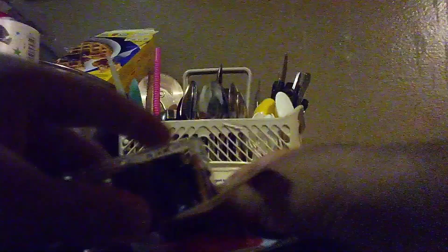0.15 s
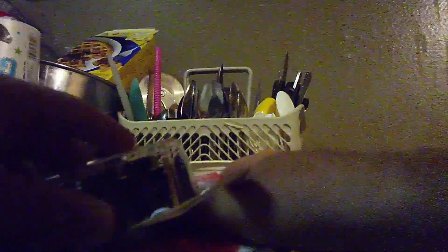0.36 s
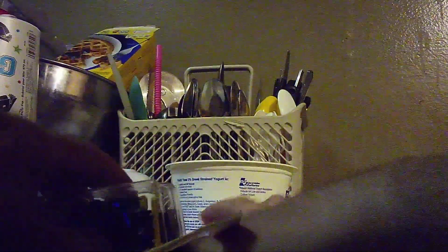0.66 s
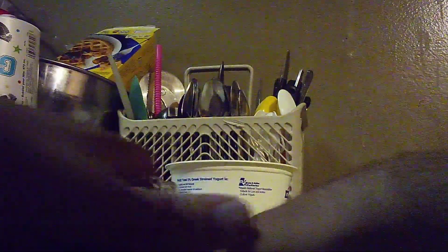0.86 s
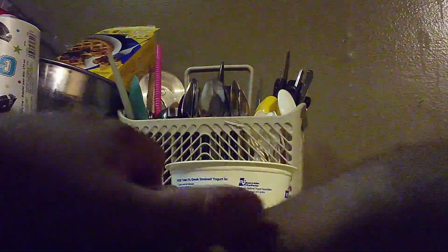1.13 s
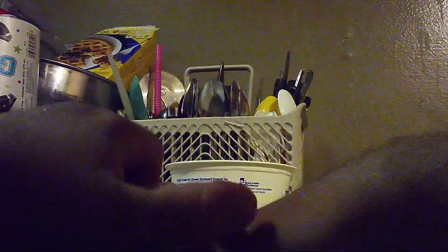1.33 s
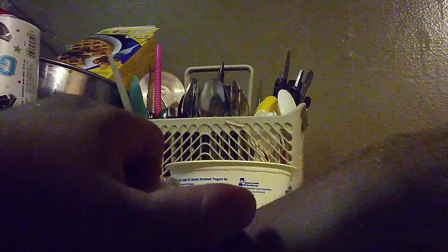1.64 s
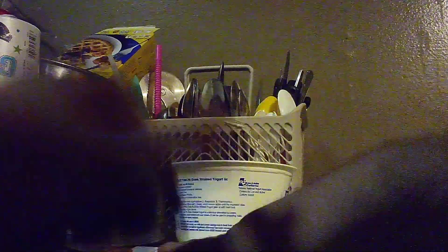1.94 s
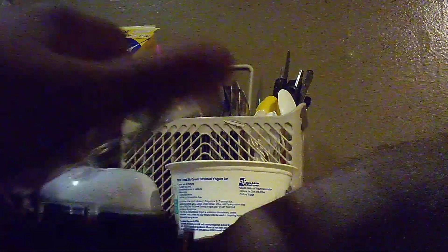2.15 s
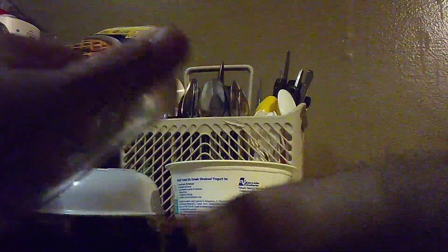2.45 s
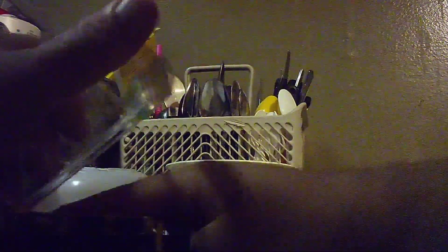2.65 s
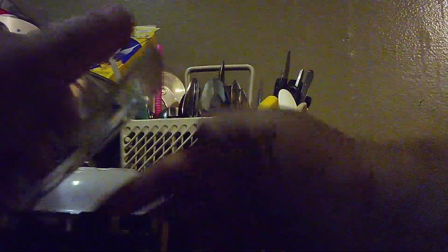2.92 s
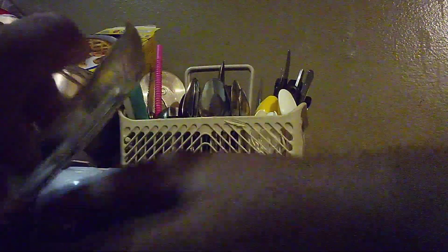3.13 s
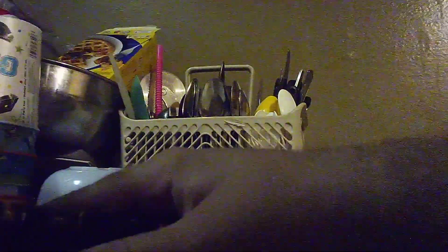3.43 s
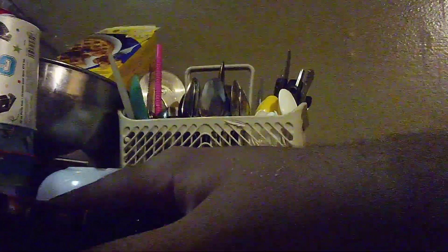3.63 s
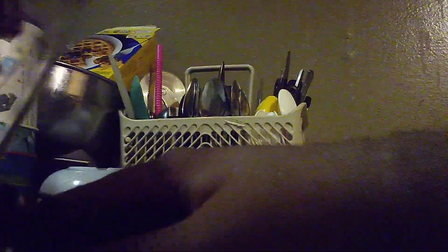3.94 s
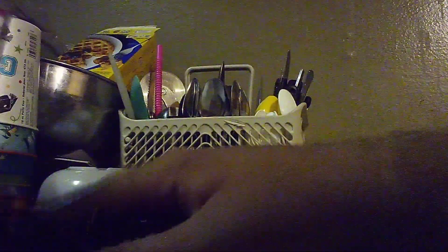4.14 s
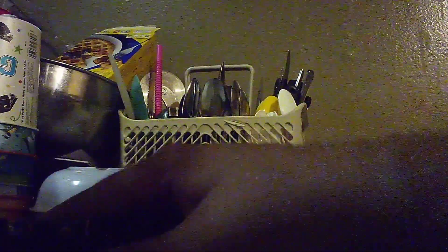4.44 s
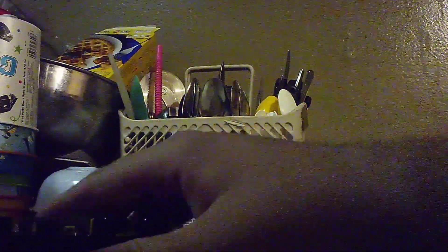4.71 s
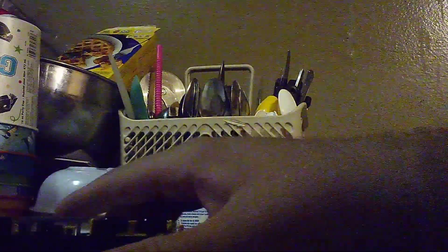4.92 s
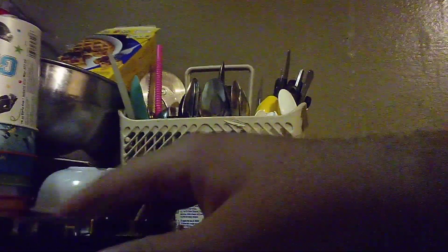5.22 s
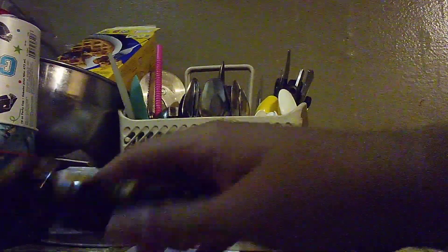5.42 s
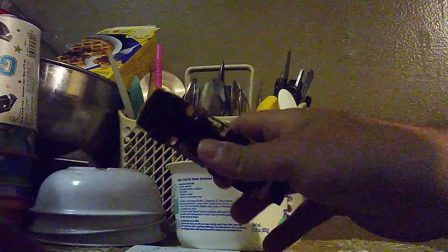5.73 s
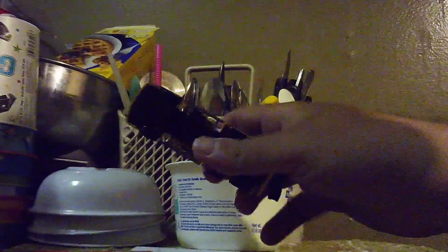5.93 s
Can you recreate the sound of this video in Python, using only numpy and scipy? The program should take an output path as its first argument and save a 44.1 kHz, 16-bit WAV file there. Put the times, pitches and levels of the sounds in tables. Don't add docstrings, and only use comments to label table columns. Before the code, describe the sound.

Thin rigid plastic buckles and pops irregularly under the fingers, with card and film rustling and brief squeaky rubs between the snaps. Some snaps bring dull thumps from the counter. The busiest cracking comes in the middle, with gaps of near quiet afterwards, then small brittle ticks and one hollow plastic knock. Dry, close sound, short room reflections, very faint steady air.

```python
import sys
import numpy as np
from scipy import signal
from scipy.fft import rfft, irfft
from scipy.io import wavfile

SR = 44100
rng = np.random.default_rng(int(sys.argv[2]) if len(sys.argv) > 2 else 0)


def voltage_ratio(decibels):
    exponent = np.asarray(decibels, float) / 20
    return 10 ** exponent


def dump_mix(stems):
    frames = np.atleast_2d(stems).T
    limited = np.clip(frames, -1, 1)
    pcm = np.round(limited * 32767).astype(np.int16)
    wavfile.write(sys.argv[1], SR, pcm)


N = 267687

# pitch_hz, density_db (per Hz)
AIR_SPECTRUM = [(18, -46.5), (30, -20.5), (214, -14.5), (276, -15), (1590, -31), (8000, -49),
                (10400, -73.5), (17600, -120)]
AIR_DB = -72
ROOM_T60_S, ROOM_DB, WALL_CUT_HZ = 0.16, -19, 6000
MIC_TOP_HZ = 6980

# pitch_hz, width_hz, level_db
COUNTER_MODES = [(92, 14, -12), (137.5, 21, 3), (191.1, 48, -14.5), (281.8, 160, -2.5)]
SHELL_MODES = [(381, 90, -2.5), (460, 260, 1.5), (591, 70, -3.5), (746, 60, 0.5), (840, 8.2, 0),
               (1040, 110, 0.5), (1326, 19, -4.5)]
CARD_MODES = [(1550, 240, -11), (1900, 46, 0.5), (2300, 320, 6.5), (2840, 270, -12), (3200, 55, -16.5)]
FILM_MODES = [(3770, 1400, -1), (4670, 720, 3.5), (5364, 300, -3), (5880, 1100, -0.5), (7000, 2600, -0.5)]
PEELING_CARD_MODES = [(4140, 200, 8), (6200, 1100, 4.5)]
FLEXING_FILM_MODES = [(4700, 240, -9.5), (6770, 330, -9)]
# start_s, end_s
PEELING_SPAN = (0.38, 0.94)
FLEXING_SPAN = (2.1, 3.4)

# time_s, level_db
COUNTER_RUMBLE = [(0.0, -73.5), (0.62, -58), (0.86, -68.5), (4.09, -72.5), (4.46, -61.5), (4.65, -75.5),
                  (6.07, -77.5)]
# time_s, level_db
COUNTER_HUM = [(5.0, -92.5), (5.15, -75.5), (5.55, -85), (5.7, -64.5), (6.07, -80)]
# start_s, peak_db, pitch_hz
COUNTER_THUMPS = [(.666, -29.5, 184), (0.707, -39, 156), (1.222, -33, 312), (1.363, -40, 290),
                  (1.544, -37, 275), (1.594, -16.5, 182), (1.5989, -20, 296), (1.885, -39, 159),
                  (1.987, -29, 310), (2.025, -19, 300.3), (2.252, -22, 336), (2.468, -33.5, 310),
                  (2.754, -24.5, 310), (2.87, -42.5, 143.4), (3.18, -41.5, 179), (3.254, -36.5, 92),
                  (3.443, -31.5, 134), (4.251, -34, 309), (4.264, -23.5, 131), (4.56, -32.5, 132.5),
                  (5.071, -44.5, 132)]
FREE_T60_S, DAMPED_T60_S = 0.19, 0.045

# pitch_hz, level_db, t60_s
TOY_MODES = [(336, 12, 0.031), (497.6, 0, 0.13), (700, 5, 0.09), (950, 10.5, 0.059), (1240, -4, 0.07)]
TOY_START_S, TOY_DB = 5.776, -23

# time_s, slips_per_s, level_db
JUDDER_SLIDES = [
    [(.375, 92, -46), (.40, 87.2, -38.5), (.46, 108, -38.5), (.52, 121, -44.5), (.535, 64, -96)],
    [(.797, 140, -45.5), (.815, 75, -41), (.85, 56, -44.5), (.87, 270, -67)],
    [(4.512, 138, -43.5), (4.522, 137, -25), (4.545, 140, -25), (4.550, 400, -47), (4.562, 360, -52.5)],
]

# start_s, hold_s, level_db
SHELL_PRESSES = [(0.031, 0.19, -60.5), (0.154, 0.23, -53.5), (0.307, 0.14, -50), (0.44, 0.27, -48),
                 (0.803, 0.16, -60), (0.972, 0.0056, -40), (1.055, 0.028, -43.5), (1.226, 0.01, -38),
                 (1.338, 0.056, -51.5), (1.483, 0.17, -54.5), (1.73, 0.21, -56.5), (1.956, 0.085, -41),
                 (2.06, 0.045, -38), (2.224, 0.11, -41.5), (2.471, 0.024, -42), (2.706, 0.087, -50.5),
                 (2.764, 0.17, -52), (3.204, 0.09, -46.5), (3.449, 0.007, -40.5), (3.851, 0.16, -60.5),
                 (4.134, 0.19, -47), (4.525, 0.088, -53.5), (4.825, 0.012, -61.5), (5.078, 0.029, -53.5),
                 (5.386, 0.061, -64.5), (5.796, 0.031, -53.5), (6.025, 0.061, -59.5)]
# start_s, hold_s, card_db, film_above_card_db
SLIDES = [(0.007, 0.16, -66, -2), (0.156, 0.22, -56.5, -2.5), (0.263, 0.568, -61, 0),
          (0.473, 0.24, -59.5, 7.5), (0.756, 0.22, -70.5, 13.5), (1.034, 0.072, -60, 0.5),
          (1.246, 0.03, -60, -4.5), (1.355, 0.05, -54, -4.5), (1.534, 0.1, -55, 1.5),
          (1.749, .2, -61.5, 2.5), (1.968, 0.05, -52.5, 9), (2.024, 0.081, -40.5, -4.5),
          (2.128, 0.13, -61.5, 3.5), (2.222, 0.091, -39.5, -2), (2.31, 0.041, -64, 12),
          (2.469, 0.012, -40.5, -8.5), (2.518, 0.026, -46.5, -3.5), (2.703, 0.21, -51.5, -2.5),
          (3.201, 0.1, -52.5, 1), (3.31, 0.11, -53.5, -4.5), (3.437, 0.01, -51.5, -18),
          (3.899, 0.037, -46.5, -11), (4.067, 0.0078, -54, 2.5), (4.121, 0.17, -40.5, -3.5),
          (4.584, 0.017, -32, -10.5), (4.606, 0.047, -41, -8.5), (4.814, 0.022, -62.5, -5.5),
          (5.067, 0.041, -69, -14), (5.375, 0.051, -60.5, -27), (5.713, .4, -58, 0)]
GRIP_DB_PER_S = 1400
SHELL_FADE_DB_PER_S, CARD_FADE_DB_PER_S, FILM_FADE_DB_PER_S = 286, 217.5, 228
SHELL_REST_DB, CARD_REST_DB, FILM_REST_DB = -97, -84.5, -84
# start_s,
# hold_s, level_db, pitch_hz, width_hz
SINGING_STROKES = [(2.195, .012, -50, 4650, 200), (2.285, .07, -46, 4650, 150),
                   (2.805, .035, -59, 4650, 200), (2.865, .055, -48, 4900, 600),
                   (4.513, .024, -57, 3700, 900), (4.515, .02, -64, 6500, 900),
                   (4.513, .024, -50, 1650, 300), (3.178, .06, -48, 4650, 200),
                   (2.417, .006, -57, 4690, 250), (2.512, .065, -52, 4650, 200),
                   (3.255, .025, -44, 4600, 500), (5.682, .03, -72, 5800, 3000), (3.06, .1, -77, 2200, 500),
                   (3.055, .04, -68, 880, 150), (4.845, .045, -60, 2440, 600), (4.845, .04, -61, 4900, 800),
                   (4.94, .12, -76, 2500, 800), (4.94, .12, -75, 5000, 1100), (5.12, .03, -60, 730, 70),
                   (5.13, .07, -77, 1960, 100), (5.17, .06, -72, 5000, 1100), (5.24, .11, -73, 4650, 700),
                   (5.24, .11, -75, 2500, 900), (5.5, .07, -76, 2500, 1500), (.39, .05, -57, 1710, 350),
                   (1.606, .03, -43, 300, 420), (4.478, .015, -63, 550, 400),
                   (2.352, .002, -41, 5600, 4000), (.24, .06, -50, 400, 100), (.65, .025, -46, 1300, 500),
                   (5.79, .045, -50, 700, 60), (4.58, .06, -46, 2800, 500), (3.45, .05, -52, 570, 260),
                   (3.45, .06, -50, 2000, 1100), (2.77, .2, -54, 840, 120), (.98, .035, -42, 680, 200)]
SING_FADE_DB_PER_S = 450

# top_s, level_db (rms), ring_hz, crack_above_ring_db, half_length_s
SHARP_CRUMPLES = [(.16, -59.5, 3200, 9.5, 0.036), (.479, -36.5, 1053, -13.5, 0.012),
                  (.608, -45, 950, -0.5, 0.0014), (.756, -48, 722, -2.5, 0.02),
                  (2.017, -30.5, 740, -4, 0.022), (2.062, -32.5, 998, -10.5, 0.025),
                  (2.253, -31, 890, 1.5, 0.026), (2.329, -33, 1040, -2.5, 0.0092),
                  (2.554, -42, 882, 5, 0.016), (2.872, -39.5, 950, 9.5, 0.014),
                  (2.911, -45.5, 2070, 6.5, 0.0099), (3.182, -31, 810, 1, 0.0089),
                  (3.264, -31, 2420, 4, 0.014), (3.308, -41, 1044, -5.5, 0.0019),
                  (4.262, -29, 381, -1, 0.014), (5.12, -46.5, 722, -3.5, 0.018),
                  (5.398, -53, 2300, 5.5, 0.019), (5.472, -45, 2830, -5, 0.022)]
# top_s, level_db (rms), ring_hz, half_length_s
SOFT_CRUMPLES = [(0.049, -63, 1067, 0.065), (0.263, -47.5, 417, 0.029), (0.394, -49, 1715, 0.016),
                 (0.654, -37.5, 980, 0.012), (1.07, -43, 704, 0.022), (1.197, -51.5, 696, 0.021),
                 (2.317, -38.5, 820, 0.015), (4.523, -46, 1667, 0.0059), (5.071, -48, 1900, 0.0034)]
SOFT_CRUMPLE_CRACK_DB = -13

# start_s, peak_db, pitch_hz
SIDE_PANELS = [(0.478, -30, 990), (0.477, -30, 1365), (.642, -31.5, 403), (.642, -31, 650),
               (3.797, -53, 885), (.972, -26.5, 1900), (.973, -16.5, 865), (1.222, -17, 807),
               (1.223, -26.5, 1850), (1.484, -31, 787), (.894, -41, 725), (1.534, -37, 754),
               (1.991, -21.5, 803), (1.99, -36, 1860), (2.021, -19, 739), (2.024, -21, 923),
               (2.025, -11, 569), (2.067, -27, 612), (2.142, -28.5, 1795), (2.234, -25, 341),
               (2.251, -27, 1340), (2.47, -25, 334.3), (3.441, -21.5, 1343), (3.439, -33, 2355),
               (3.442, -19, 1846), (3.893, -22, 984), (3.895, -26.5, 1327), (4.227, -17, 1018),
               (4.223, -33.5, 1990), (4.253, -15, 404), (4.252, -19.5, 959), (4.267, -23.5, 1080),
               (4.559, -16, 1488), (4.559, -24, 1070), (4.818, -53, 1590), (5.07, -43, 707),
               (5.116, -39.5, 1390), (5.113, -37.5, 1880), (5.777, -30.5, 1880), (.177, -49, 620),
               (.388, -44, 1720), (.56, -41, 2140), (0.892, -50, 1460), (1.232, -31.5, 705),
               (0.972, -18.5, 1040), (1.836, -38.5, 1570), (2.844, -47.5, 840), (2.215, -31, 792)]
# start_s, peak_db, pitch_hz
FILM_FACETS = [(2.023, -19, 2520), (2.024, -21, 2160), (2.034, -13, 2136), (2.035, -22, 2850),
               (2.067, -18.5, 2166), (2.143, -20, 2187), (2.142, -18, 3650), (2.19, -26, 2200),
               (2.19, -27, 3670), (2.22, -14, 3860), (2.251, -18, 2526), (2.298, -23, 2290),
               (2.87, -26, 4970), (2.874, -24, 5300), (2.903, -36, 5400), (2.917, -25.5, 4670),
               (2.955, -36, 4700), (2.976, -43, 4770), (3.181, -26.5, 2140), (3.182, -28, 6820),
               (3.258, -32, 4600), (3.266, -25, 4680), (3.269, -27, 5400), (3.327, -46, 2460),
               (3.678, -60.5, 2680), (3.693, -65.5, 2720), (3.709, -54, 2720), (3.74, -64, 2730),
               (3.815, -57, 2720), (3.829, -52, 2770), (3.85, -49, 2750), (3.85, -53, 4660),
               (3.891, -25.5, 7000), (3.797, -54, 4630), (3.892, -12.5, 2338), (4.019, -48, 2530),
               (4.113, -34, 3190), (4.267, -12.5, 3530), (4.56, -16, 4280), (4.561, -9, 2623),
               (4.832, -47, 4570), (4.841, -40, 5080), (4.853, -45, 2380), (4.866, -46, 2430),
               (4.867, -49, 4670), (4.876, -46.5, 2430), (5.335, -54, 4660), (3.441, -43, 3840),
               (5.099, -61, 3300), (5.232, -33, 4670), (5.233, -40.5, 2580), (5.233, -40.5, 5610),
               (5.377, -32, 2140), (5.447, -41, 2050), (5.462, -42, 2540), (5.467, -32, 3400),
               (5.475, -33, 2500), (5.477, -28.5, 3760), (1.525, -47, 2200), (1.366, -30, 3951)]
PANEL_T60_S, FACET_T60_S = 0.026, 0.014

# start_s, peak_db, ring_hz
SHELL_KNOCKS = [(0.073, -42, 1040), (1.223, -19.5, 1375), (1.592, -22, 402), (1.662, -31.5, 1530),
                (1.806, -39.5, 1550), (1.885, -28.5, 460), (2.249, -15, 2300), (3.441, -15, 583),
                (3.872, -27, 1254), (3.894, -13, 1780), (4.225, -18, 1900), (5.072, -36.5, 423),
                (5.287, -50, 2760), (5.327, -48, 2450), (5.645, -54, 2730)]
# start_s, peak_db, ring_hz
PANEL_BUCKLES = [(0.643, -26, 880), (.871, -43.5, 687), (0.972, -13, 656), (1.484, -29, 355),
                 (1.545, -25, 724), (1.772, -40.5, 1700), (1.953, -37.5, 495), (1.99, -24.5, 434),
                 (2.039, -13, 994), (2.232, -19, 844), (2.548, -29, 941), (2.958, -40, 1040),
                 (3.234, -30.5, 996), (3.797, -48, 2760), (3.848, -50, 810), (4.019, -45.5, 930),
                 (4.252, -14, 1023), (4.842, -29, 2320), (4.935, -46, 1990), (5.114, -36.5, 740),
                 (5.377, -30, 2680), (5.447, -35.5, 2650)]
# start_s, peak_db, ring_hz, ring_t60_s
CREASE_POPS = [(0.176, -52, 684, .06), (1.228, -30.5, 950, .043), (1.829, -35.5, 360, .039),
               (2.033, -7, 773, .022), (2.142, -13, 972, .15), (2.2141, -21, 750, .03),
               (2.298, -22, 860, .021), (2.394, -32, 2000, .06), (2.469, -10, 948, .02),
               (2.755, -14.5, 821, .12), (2.893, -28.5, 2810, .06), (3.059, -52, 910, .06),
               (3.389, -33.5, 2213, .038), (3.74, -51.5, 842, .04), (4.114, -7, 900, .02),
               (4.561, -11, 1900, 0.0083), (4.816, -30.5, 2230, .035), (5.475, -34, 2540, .071)]
# start_s, peak_db, ring_hz
FILM_CRACKS = [(0.547, -56, 760), (1.367, -28, 780), (1.535, -22, 1490), (1.731, -41.5, 1550),
               (2.024, -15.5, 424), (2.067, -24.5, 1100), (2.19, -26, 840), (2.22, -27, 2190),
               (2.253, -20.5, 370), (2.421, -41, 2410), (2.871, -25.5, 995), (2.942, -40, 4700),
               (3.222, -30.5, 1900), (3.364, -30, 2300), (3.678, -58, 886), (3.692, -50.5, 886),
               (3.71, -53, 834), (3.815, -46, 850), (3.83, -43, 814), (4.267, -11, 2590),
               (4.285, -25.5, 2250), (4.83, -39, 2110), (5.233, -42, 4670), (5.391, -31.5, 2040),
               (5.491, -39, 1990)]
KNOCK_CRACK_DB, BUCKLE_CRACK_DB, POP_CRACK_DB, FILM_CRACK_DB = -36, -19, -7.5, -4
KNOCK_T60_S, BUCKLE_T60_S, FILM_T60_S = 0.063, 0.09, 0.058


def rms_one(x):
    return x / np.sqrt(np.mean(x ** 2) + 1e-20)


def peak_one(x):
    return x / (np.max(np.abs(x)) + 1e-20)


def in_time(rows):
    s, *columns = np.transpose(rows)
    return [np.interp(np.arange(N) / SR, s, c) for c in columns]


def drift(rate_hz):
    r = np.exp(-80 * np.pi * rate_hz / SR)
    noise = rng.standard_normal(N // 40 + 2002)
    slow = signal.lfilter([1], [1, -2 * r, r * r], noise)[2000:]
    return np.interp(np.arange(N) / 40, np.arange(len(slow)), rms_one(slow))


def band(x, lo_hz, hi_hz):
    return signal.sosfilt(signal.butter(2, [lo_hz, hi_hz], "band", fs=SR, output="sos"), x)


def resonate(x, hz, width_hz):
    r = np.exp(-np.pi * width_hz / SR)
    rise = (1 - r * r) / 2 * np.array([1, 0, -1])
    return signal.lfilter(rise, [1, -2 * r * np.cos(2 * np.pi * hz / SR), r * r], x)


def resonate_twice(x, hz, width_hz):
    return resonate(resonate(x, hz, width_hz), hz, width_hz)


def t60_width(t60):
    return np.log(1000) / np.pi / t60


def body(x, modes, spread_db=0):
    gains = voltage_ratio(np.array(modes)[:, 2] + spread_db)
    return sum((-1) ** k * gains[k] * resonate(x, hz, width) for k, (hz, width, db) in enumerate(modes))


def strokes(starts, holds, levels_db, fade_db_per_s, rest_db):
    t = np.arange(0, N + 64, 32) / SR
    power = voltage_ratio(rest_db) ** 2
    for s, hold, db in zip(starts, holds, levels_db):
        bite_db = GRIP_DB_PER_S * np.maximum(s - t, 0)
        fade_db = fade_db_per_s * np.maximum(t - s - hold, 0)
        power = power + voltage_ratio(db - bite_db - fade_db) ** 2
    return np.interp(np.arange(N) / SR, t, np.sqrt(power))


def room_tone():
    hz = np.fft.rfftfreq(N, 1 / SR) + 1
    shape_hz, shape_db = np.transpose(AIR_SPECTRUM)
    shape = voltage_ratio(np.interp(np.log(hz), np.log(shape_hz), shape_db))
    return voltage_ratio(AIR_DB - 5.0) * rms_one(irfft(rfft(rng.standard_normal(N)) * shape, N))


def room(x):
    t = np.arange(SR // 3) / SR
    tail = rng.standard_normal(len(t)) * voltage_ratio(-60 * t / ROOM_T60_S) * (t > 0.003)
    tail = band(tail, 180, WALL_CUT_HZ)
    return signal.fftconvolve(x, tail / np.sqrt(np.sum(tail ** 2)))[:N]


def hum():
    drone = resonate_twice(rng.standard_normal(N), 140, 25)
    return voltage_ratio(in_time(COUNTER_HUM)[0]) * rms_one(drone)


def thumps():
    size = round(0.3 * SR)
    t, out = np.arange(size) / SR, np.zeros(N + size)
    push = np.sin(np.pi * np.minimum(t / 0.0028, 1)) + 1e-18
    for s, peak_db, hz in COUNTER_THUMPS:
        t60 = FREE_T60_S if 110 < hz < 150 else DAMPED_T60_S
        mode = peak_one(resonate(push, hz, t60_width(np.clip(t60, 0.01, 0.4))))
        neighbours = peak_one(band(push, 75, 370))
        at = round(s * SR)
        out[at:at + size] += voltage_ratio(peak_db) * peak_one(mode + 0.5 * neighbours)
    return out[:N]


def toy():
    t = np.arange(SR // 2) / SR
    rings = sum(voltage_ratio(db - 60 * t / np.clip(t60, 0.01, 0.25)) * np.sin(2 * np.pi * hz * t)
                for hz, db, t60 in TOY_MODES)
    rattle = rng.standard_normal(len(t)) * np.exp(-t / 0.0097)
    rattle = band(band(rattle, 210, 1730), 240, 1080)
    knock = peak_one(rings * (1 - np.exp(-t / 0.0027))) + 0.97 * peak_one(rattle)
    return np.concatenate([np.zeros(round(TOY_START_S * SR)), voltage_ratio(TOY_DB) * knock])[:N]


def judder():
    out = np.zeros(N)
    for rows in JUDDER_SLIDES:
        span = slice(round(rows[0][0] * SR), round(rows[-1][0] * SR))
        per_s, level_db = (c[span] for c in in_time(rows))
        phase = 2 * np.pi * np.cumsum(per_s * (1 + 0.025 * drift(40)[span])) / SR
        dip = 0
        for k in range(1, 4):
            lift = 1 + 2.24 * np.exp(-((k * per_s - 275) / 40) ** 2)
            dip = dip + lift * k ** -1.6 * np.cos(k * (phase + 0.37))
        noise = rng.standard_normal(len(phase))
        tick = rms_one(resonate_twice(noise, 1700, 500)) + 0.092 * rms_one(band(noise, 3100, 3600))
        out[span] += voltage_ratio(level_db) * (0.022 * (1 + np.cos(phase)) * tick - dip)
    return out


def rustle(modes, lo_hz, hi_hz, per_s, smooth, flat, patchy_db):
    sizes = voltage_ratio(3.5 * np.minimum(rng.exponential(1, N), 4)) * rng.choice([-1, 1], N)
    slips = sizes * (rng.random(N) < per_s * voltage_ratio(3.0 * drift(25)) / SR)
    friction = rms_one(slips) + smooth * rng.standard_normal(N)
    tone = rms_one(body(friction, modes)) + flat * rms_one(band(friction, lo_hz, hi_hz))
    return rms_one(band(tone, lo_hz * 0.81, hi_hz * 1.66) * voltage_ratio(patchy_db * drift(23)))


def rubbing():
    s, hold, card_db, above_db = np.transpose(SLIDES)
    t = np.arange(N) / SR
    film = rustle(FILM_MODES, 3500, 8000, per_s=3000, smooth=1.6, flat=5, patchy_db=1.2)
    peel = rustle(PEELING_CARD_MODES, 2100, 5100, per_s=2700, smooth=3.7, flat=0.44, patchy_db=-2.0)
    flex = rustle(FLEXING_FILM_MODES, 3500, 8000, per_s=900, smooth=0.8, flat=2.2, patchy_db=2.5)
    film = np.where((t > PEELING_SPAN[0]) & (t < PEELING_SPAN[1]), peel, film)
    film = np.where((t > FLEXING_SPAN[0]) & (t < FLEXING_SPAN[1]), flex, film)
    counter = rustle(COUNTER_MODES, 40, 160, per_s=250, smooth=1.0, flat=3.5, patchy_db=2.5)
    shell = rustle(SHELL_MODES, 210, 1400, per_s=510, smooth=0.77, flat=0.88, patchy_db=3.5)
    card = rustle(CARD_MODES, 1200, 3700, per_s=1200, smooth=0.88, flat=4.5, patchy_db=1.5)
    counter_gain = voltage_ratio(in_time(COUNTER_RUMBLE)[0])
    shell_gain = strokes(*np.transpose(SHELL_PRESSES), SHELL_FADE_DB_PER_S, SHELL_REST_DB)
    card_gain = strokes(s, hold, card_db, CARD_FADE_DB_PER_S, CARD_REST_DB)
    film_gain = strokes(s, hold, card_db + above_db, FILM_FADE_DB_PER_S, FILM_REST_DB)
    return counter_gain * counter + shell_gain * shell + card_gain * card + film_gain * film


def singing():
    out = np.zeros(N)
    noise = rng.standard_normal(N) * voltage_ratio(2.5 * drift(50))
    for s, hold, db, hz, width_hz in SINGING_STROKES:
        span = slice(round((s - 0.006) * SR), round((s + hold + 0.3) * SR))
        tone = rms_one(resonate_twice(noise[span], hz, width_hz))
        out[span] += strokes([s], [hold], [db], SING_FADE_DB_PER_S, -140)[span] * tone
    return out


def overtones():
    t, out = np.arange(SR // 10) / SR, np.zeros(N + SR)
    rows = [(*row, PANEL_T60_S) for row in SIDE_PANELS] + [(*row, FACET_T60_S) for row in FILM_FACETS]
    for (s, peak_db, hz, t60), turn in zip(rows, rng.random(len(rows))):
        envelope = voltage_ratio(peak_db - 60 * t / t60) * (1 - np.exp(-t / 0.00029))
        at = round(s * SR)
        out[at:at + len(t)] += envelope * np.sin(2 * np.pi * (hz * t + turn))
    return out[:N]


def struck(contact, scatter, hz, t60, crack_db, chance):
    width = t60_width(np.clip(t60, 0.008, 75 / hz))
    twin_hz = hz * (1 + 0.07 * chance[-1])
    tail = peak_one(resonate(contact, hz, width) + resonate(contact, twin_hz, width))
    panel = 0.5 * tail + peak_one(resonate(contact, hz, 4 * width))
    modes = [(f, 2 * w, db) for f, w, db in SHELL_MODES + CARD_MODES]
    shell = body(contact, modes, 4.5 * chance[:len(modes)]) + 0.3 * contact
    top_hz = max(np.clip(hz * 3.38, 1900, 4000), 1.8 * hz)
    ring = peak_one(panel) + 0.81 * peak_one(band(shell, hz / 1.99, top_hz))
    ring = band(ring, hz / 7.6, top_hz)
    crack = body(scatter, FILM_MODES, 4.8 * chance[-len(FILM_MODES):]) + 0.5 * band(scatter, 2900, 8000)
    return peak_one(ring) + voltage_ratio(crack_db) * peak_one(crack)


def crumples():
    size, lead = round(0.24 * SR), round(0.08 * SR)
    t, out = np.arange(size) / SR - 0.08, np.zeros(N + size)
    soft = [(s, db, hz, SOFT_CRUMPLE_CRACK_DB, half) for s, db, hz, half in SOFT_CRUMPLES]
    for s, level_db, hz, crack_db, half in sorted(SHARP_CRUMPLES + soft):
        draw, chance = rng.random((3, size)), rng.standard_normal(32)
        sizes = voltage_ratio(-4.0 * np.log(draw[1] + 0.029)) * np.sign(draw[2] - 0.5)
        cracks = (draw[0] < 500 / SR) * sizes
        swell = np.exp(-np.abs(t / half) ** 2.0)
        grit = (cracks + 0.06 * rng.standard_normal(size)) * swell + 1e-18
        at = round(s * SR)
        out[at:at + size] += voltage_ratio(level_db + 8.5) * struck(grit, grit, hz, 0.062, crack_db + 3.0, chance)
    return out[lead:lead + N]


def snaps():
    size = round(0.2 * SR)
    t, out = np.arange(size) / SR, np.zeros(N + size)
    rise = 1 - np.exp(-t / 0.0004)
    rows = [(*row, KNOCK_T60_S, KNOCK_CRACK_DB) for row in SHELL_KNOCKS]
    rows += [(*row, BUCKLE_T60_S, BUCKLE_CRACK_DB) for row in PANEL_BUCKLES]
    rows += [(*row, POP_CRACK_DB) for row in CREASE_POPS]
    rows += [(*row, FILM_T60_S, FILM_CRACK_DB) for row in FILM_CRACKS]
    for s, peak_db, hz, t60, crack_db in sorted(rows):
        noise, chance = rng.standard_normal((2, size)), rng.standard_normal(32)
        contact = noise[0] * rise * np.exp(-t / 0.0009) + 1e-18
        scatter = noise[1] * rise * (np.exp(-t / 0.0012) + 0.06 * np.exp(-t / 0.006)) + 1e-18
        at = round(s * SR)
        out[at:at + size] += voltage_ratio(peak_db) * struck(contact, scatter, hz, t60, crack_db + 3.5, chance)
    return out[:N]


def scene():
    hits = snaps() + crumples() + toy()
    dry = hits + voltage_ratio(ROOM_DB) * room(hits)
    dry += thumps() + judder() + hum() + rubbing() + room_tone()
    return (dry + overtones() + singing())[None]


def roll_off(x):
    return signal.sosfilt(signal.butter(12, 8360, fs=SR, output="sos"), x)


def record(dry):
    x = signal.sosfilt(signal.butter(2, 55, "high", fs=SR, output="sos"), dry)
    x = signal.sosfilt(signal.butter(14, MIC_TOP_HZ, fs=SR, output="sos"), x)
    mix = 0.74 * np.tanh(x / 0.89)
    return roll_off(mix)


dry = scene()
out = record(dry)
dump_mix(out)
```